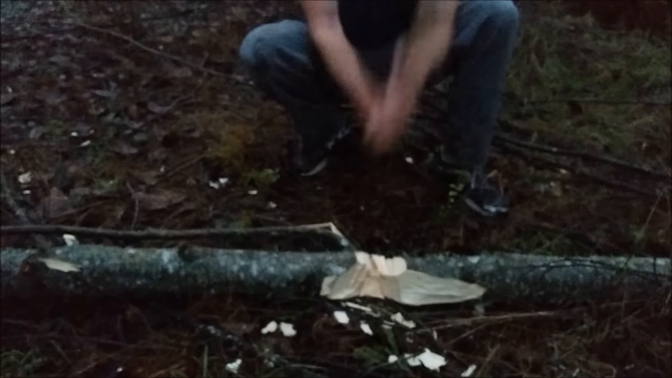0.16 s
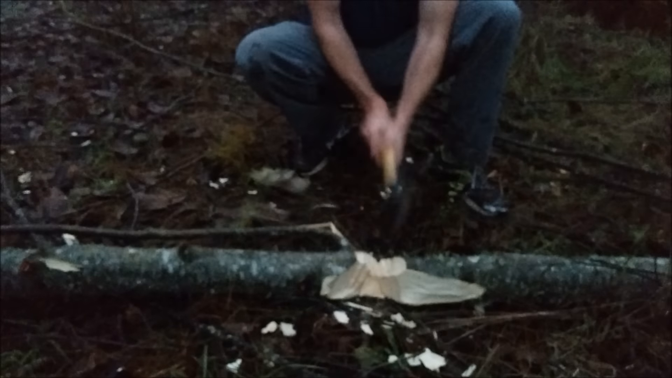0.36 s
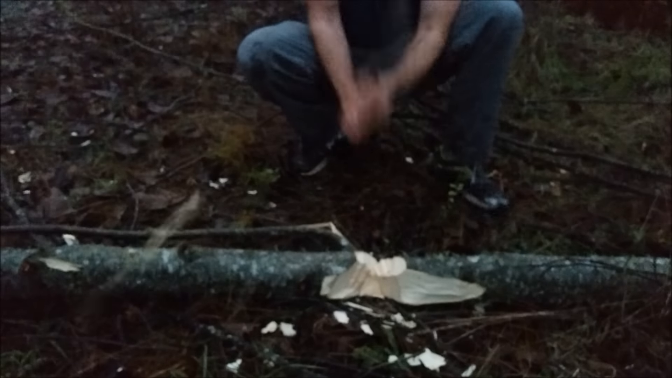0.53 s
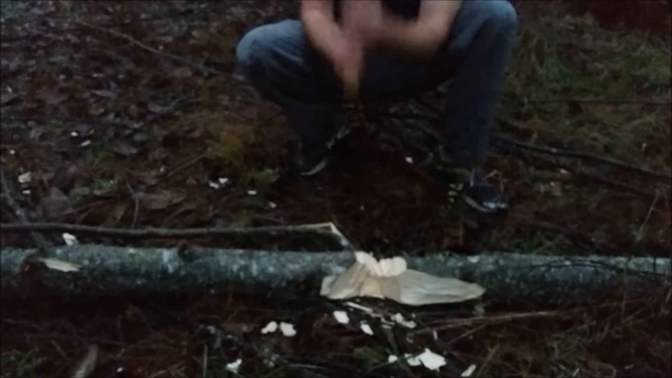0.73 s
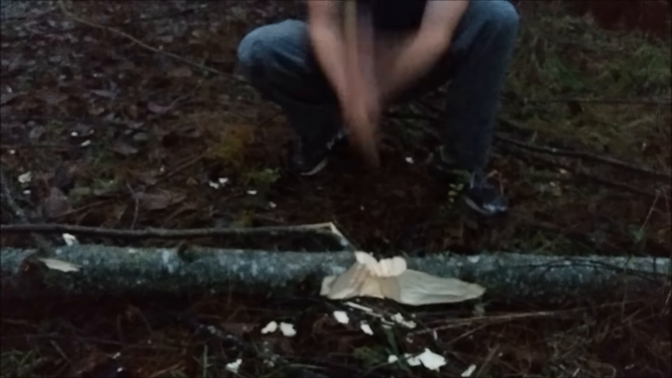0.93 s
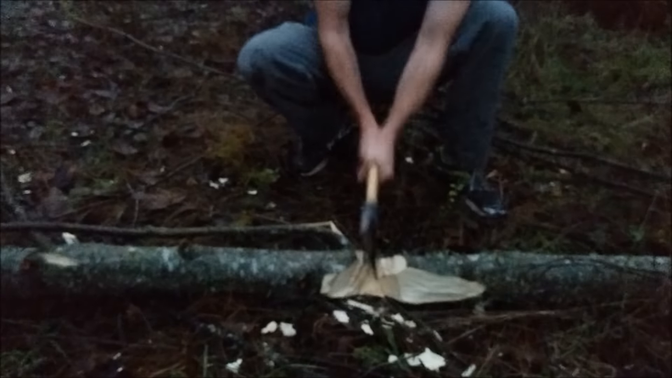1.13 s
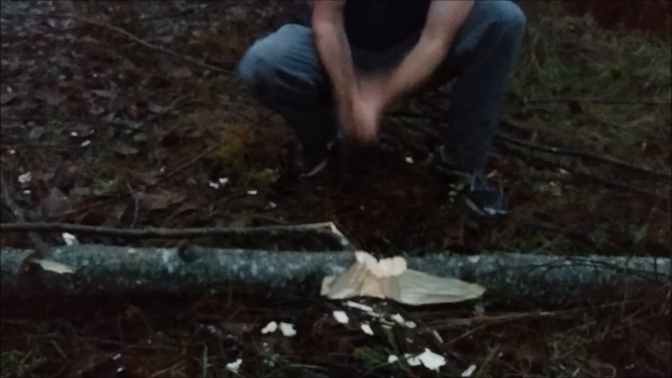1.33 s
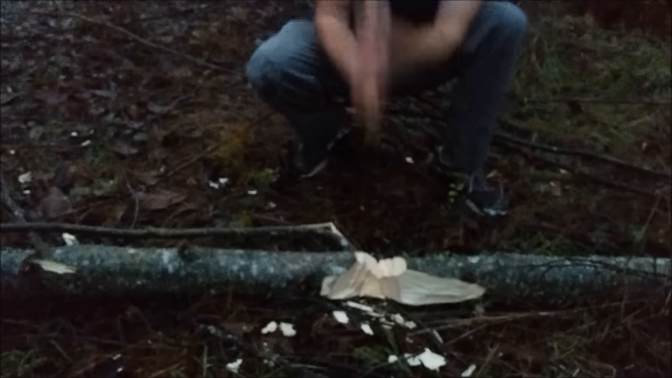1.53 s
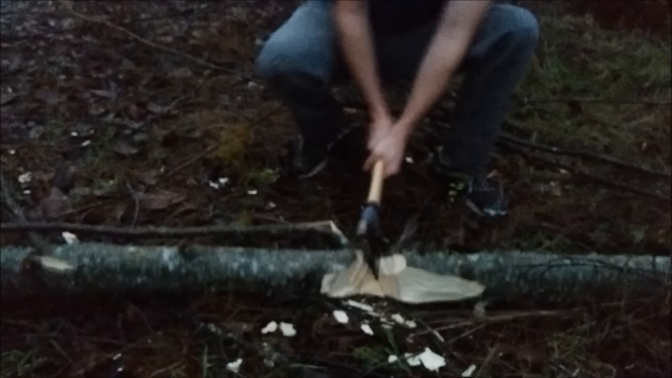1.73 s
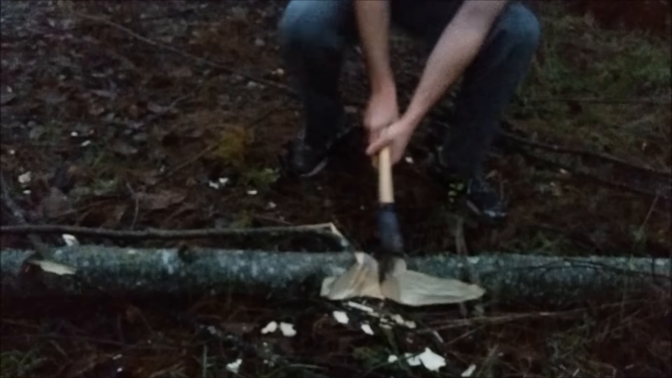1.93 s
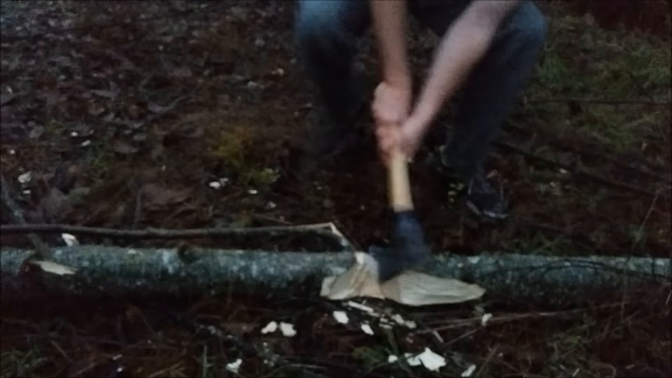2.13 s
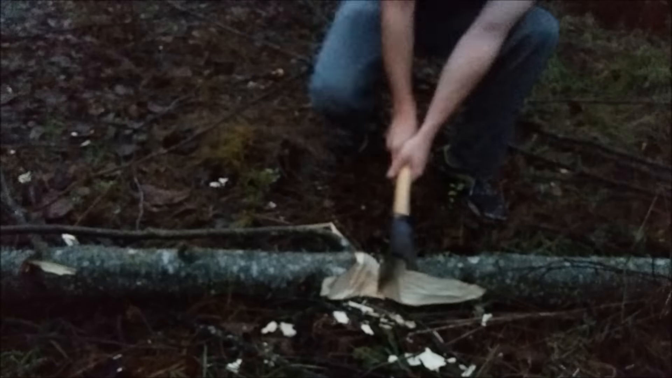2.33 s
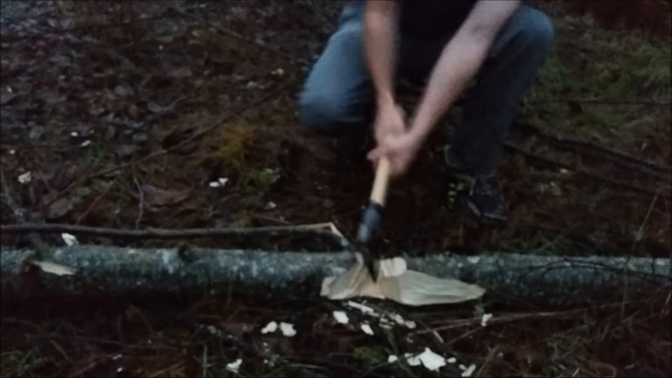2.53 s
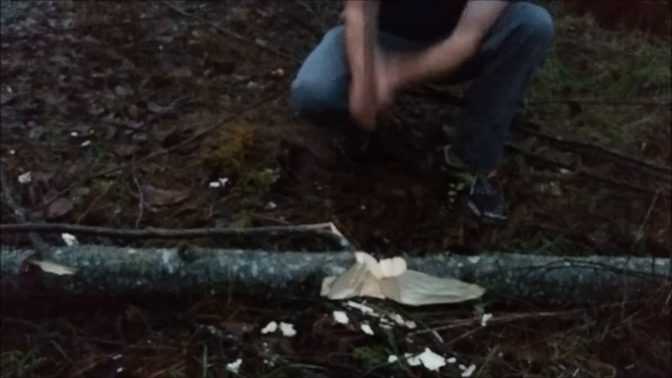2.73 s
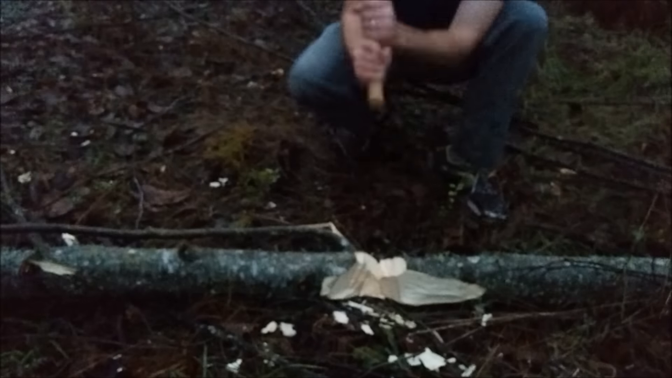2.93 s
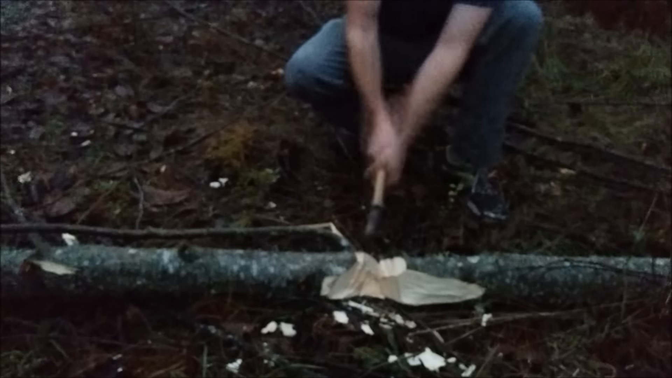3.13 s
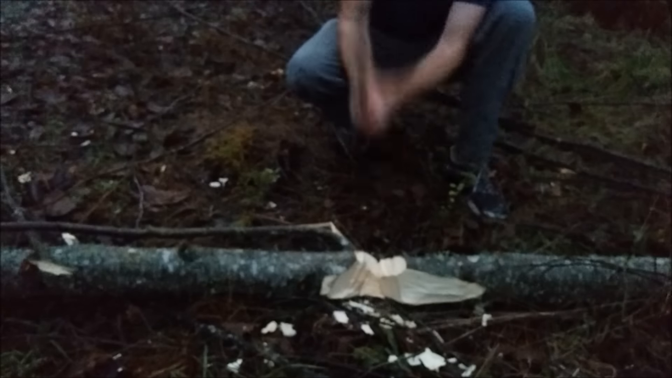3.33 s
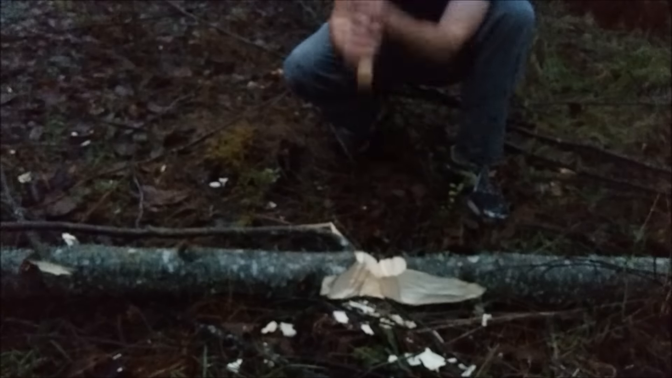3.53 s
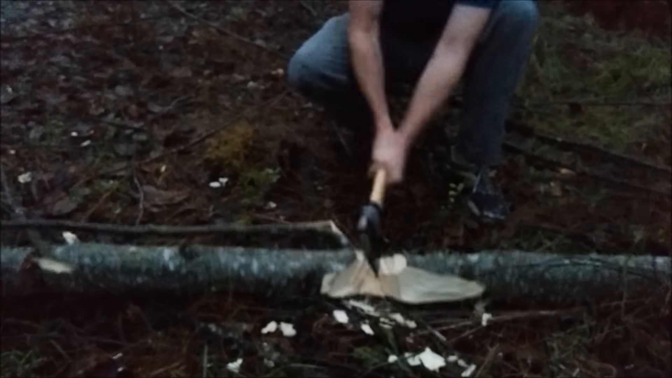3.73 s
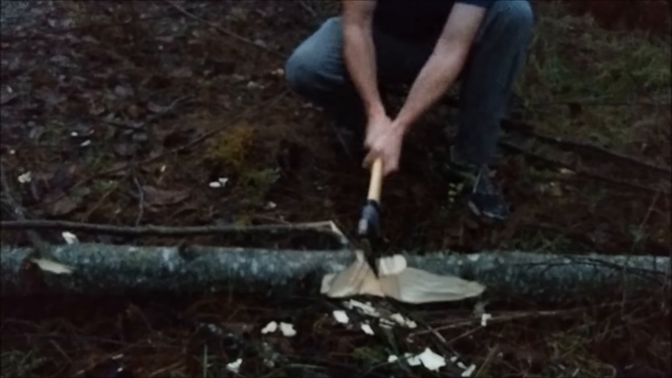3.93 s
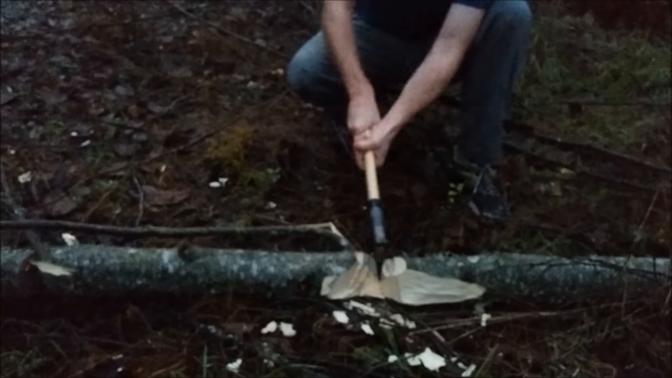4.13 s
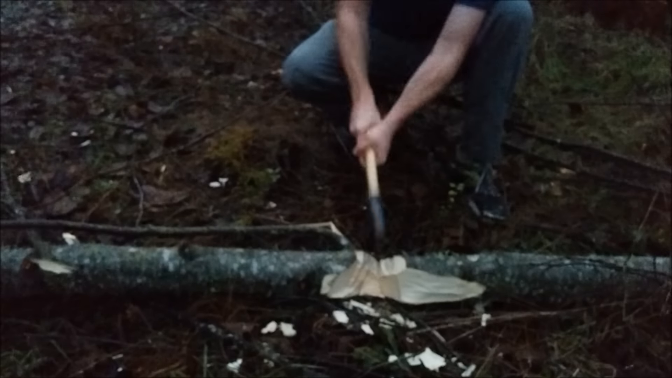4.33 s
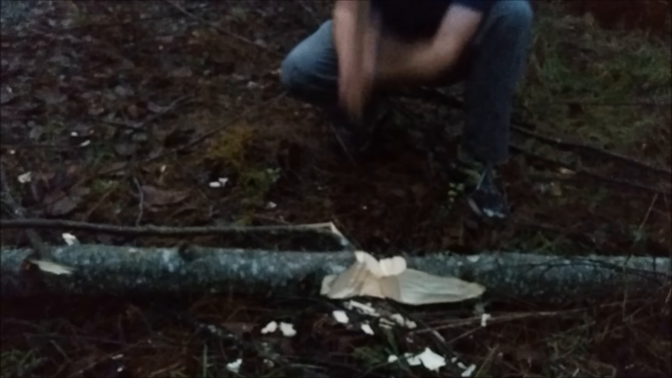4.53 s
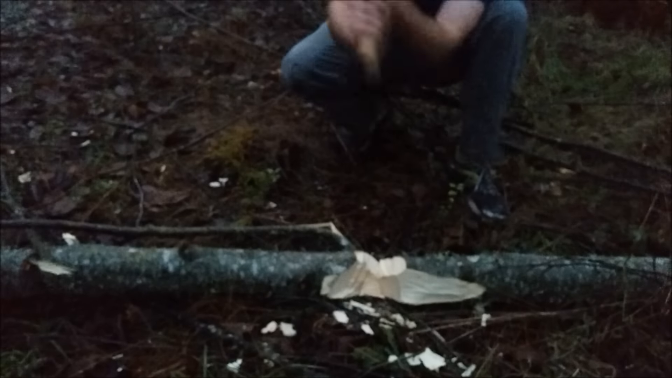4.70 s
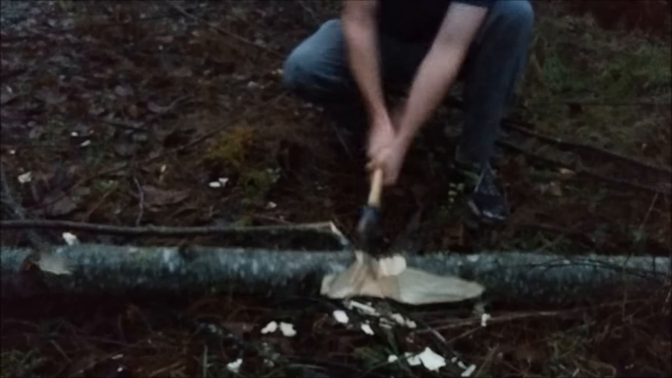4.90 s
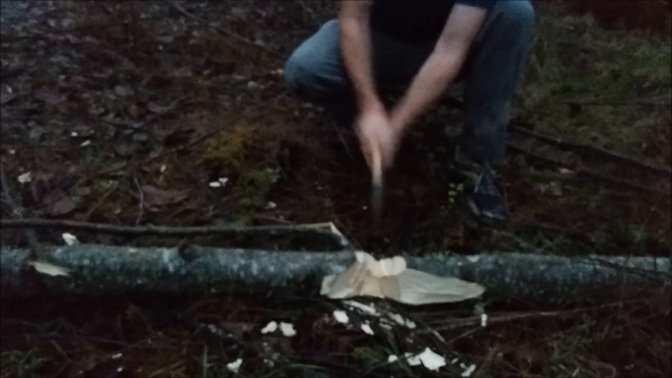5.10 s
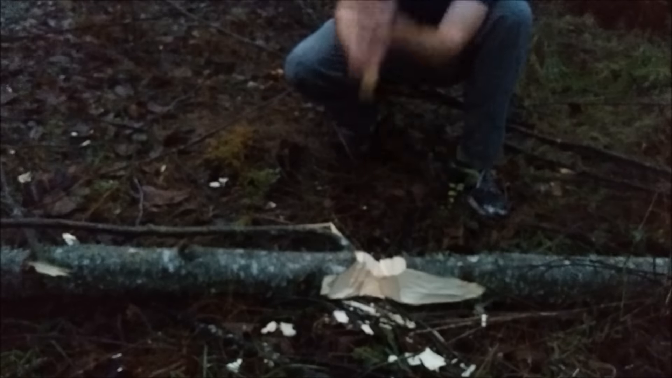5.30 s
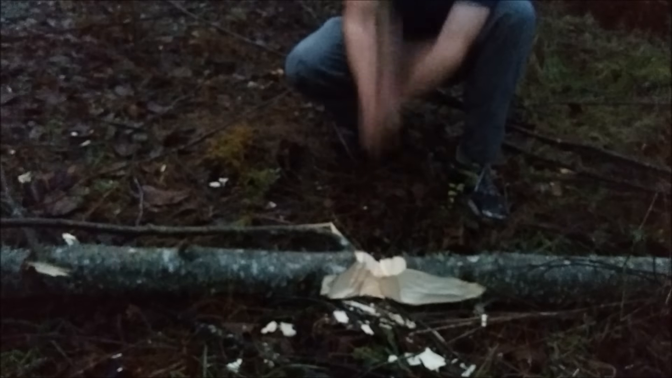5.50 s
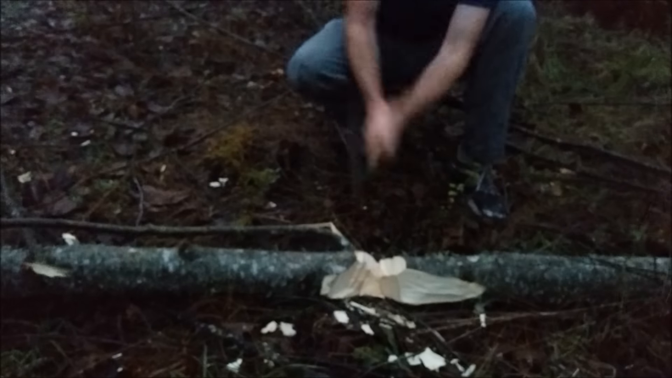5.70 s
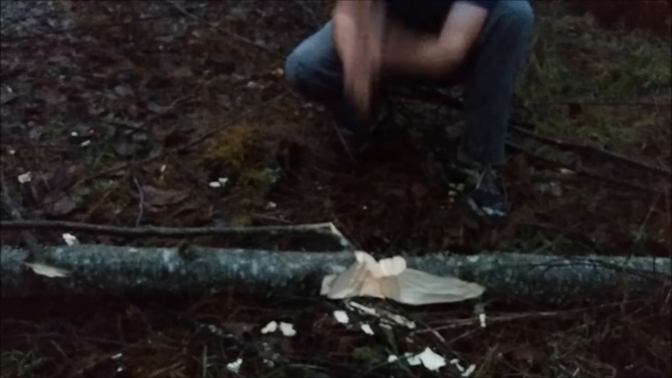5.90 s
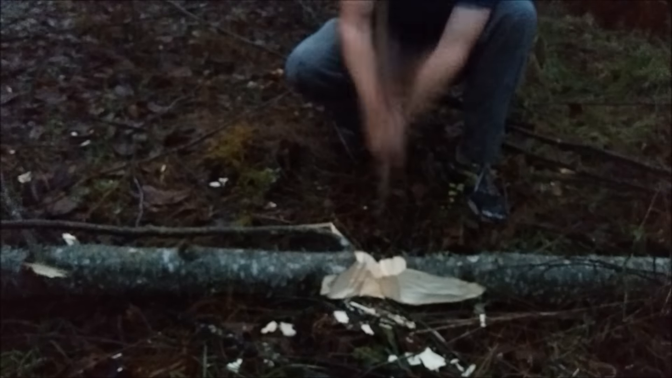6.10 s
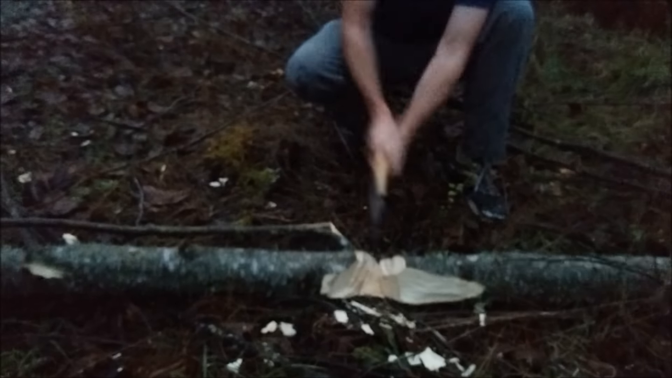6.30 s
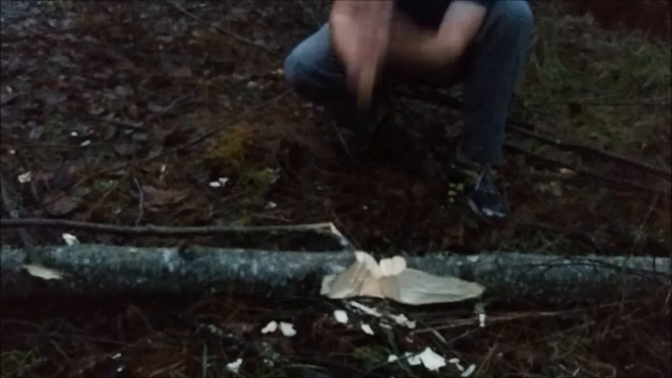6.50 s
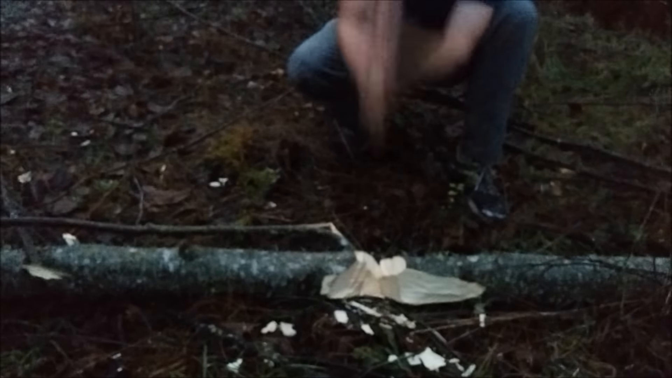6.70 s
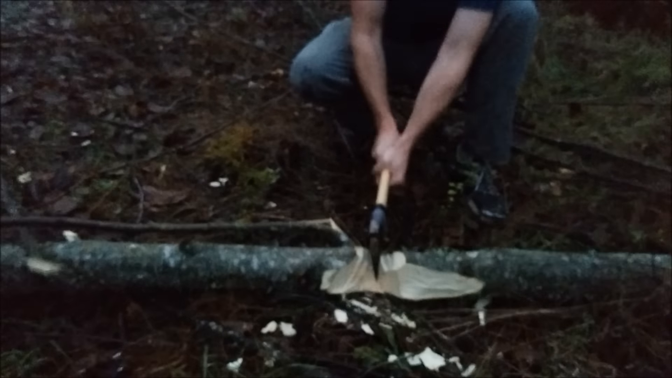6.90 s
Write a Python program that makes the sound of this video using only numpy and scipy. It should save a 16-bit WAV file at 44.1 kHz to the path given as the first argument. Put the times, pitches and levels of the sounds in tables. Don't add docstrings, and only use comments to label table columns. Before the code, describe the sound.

A very quiet forest with faint air and hiss, heard an arm's length from a fallen log. The weak tail of an earlier axe stroke fades among distant trees. At 0.3 s a small axe bites with a bright, splintery crack and short hollow trunk ring; a duller blow follows at 1.15 and a sharp one at 1.75. From 2.1 to 2.35 the edge scrapes the notch, a grainy rasp with a woody hum and low knock at 2.2, then a faint rub until 2.6. Darker chops land at 3.2 and 3.8, then a loud crack at 5.0, a full ring at 5.65, a dark, far-carrying blow at 6.25 and a strongly ringing, softer-cracked one at 6.9. Little chip ticks and splinter snaps fall between. Each blow has a faint bark brush before it, a soft ground thud and brief tree scatter, its tail quickly pushed down.

```python
import sys
import numpy as np
from scipy import signal
from scipy.fft import rfft, irfft
from scipy.io import wavfile
from scipy.ndimage import uniform_filter1d, map_coordinates

SR = 44100
rng = np.random.default_rng(int(sys.argv[2]) if len(sys.argv) > 2 else 0)


def bounce(signal):
    frames = np.transpose(np.atleast_2d(signal))
    limited = np.clip(frames, -1, 1)
    pcm = np.round(limited * 32767).astype(np.int16)
    wavfile.write(sys.argv[1], SR, pcm)


def boost_factor(decibels):
    exponent = np.asarray(decibels, float) / 20
    return 10 ** exponent


N = 306495


def unit(x):
    return x / np.sqrt(np.mean(x ** 2) + 1e-20)


def along(points, hz):
    f, v = np.transpose(points)
    return np.interp(np.log(hz + 1), np.log(f + 1), v)


def noise(n, spectrum):
    hz = np.fft.rfftfreq(n, 1 / SR)
    return unit(irfft(rfft(rng.standard_normal(n)) * boost_factor(along(spectrum, hz)), n))


def patchy_noise(n, spectrum, depth_db):
    z = signal.stft(noise(n, spectrum), nperseg=512)[2]
    field = uniform_filter1d(rng.standard_normal(z.shape), size=4, axis=0)
    field = uniform_filter1d(field, size=5, axis=1)
    return unit(signal.istft(z * boost_factor(depth_db * unit(field)), nperseg=512)[1][:n])


def fade(t, t60, rise):
    return boost_factor(-60 * t / t60) * (1 - np.exp(-t / rise))


def add(track, s, sound):
    part = track[round(s * SR):][:len(sound)]
    part += sound[:len(part)]


def gate(x, closes, depth_db):
    hz, frame, z = signal.stft(x, SR, nperseg=256)
    treble = 1 / (1 + (6000 / (hz[:, None] + 1)) ** 3)
    bass = .4 / (1 + (hz[:, None] / 120) ** 4)
    at = closes[0] + treble * (closes[1] - closes[0])
    shut = 1 / (1 + np.exp(np.clip((at - frame) / .008, -50, 50)))
    gain = boost_factor(depth_db * (1.5 - .1 * treble - bass) * shut)
    return signal.istft(z * gain, SR, nperseg=256)[1][:len(x)]


def air():
    # f/Hz, level/dB
    quiet = [(8, -59.5), (20, -15), (60, -8), (120, -6.5), (300, -9.5), (520, -7), (1000, -11),
             (1300, -15.5), (2000, -14.5), (3000, -18), (6000, -21.5), (12000, -24), (16000, -26)]
    z = signal.stft(noise(N, quiet), nperseg=512)[2]
    field = uniform_filter1d(uniform_filter1d(rng.standard_normal(z.shape), 4, 0), 6, 1)
    patchy = np.linspace(1.3, .3, num=len(z))[:, None]
    hiss = unit(signal.istft(z * boost_factor(0.9 * unit(field) * patchy), nperseg=512)[1][:N])
    return boost_factor(-76) * hiss


def cheek_rub(t):
    start_s, rise_s, hold_s, fall_s = 2.365, 0.036, .11, 0.13
    cheek = [(100, -12), (400, -7.0), (800, -11), (2500, -14), (2900, -4.5), (3250, -13.5), (4100, -9),
             (4600, -19.0), (6000, -15.0), (8000, -29.5), (12000, -60)]
    slide = np.interp(t, start_s + np.cumsum([0, rise_s, hold_s, fall_s]), [0, 1, 1, 0]) ** 2
    catches = boost_factor(3.3 * map_coordinates(rng.standard_normal(N // 200 + 4), [np.arange(N) / 260]))
    return boost_factor(-64.5) * slide * unit(catches) * noise(N, cheek)


def scrape():
    # t/s, level/dB, wood hum against hiss/dB
    pull = [
        (2.11, -83, 4),
        (2.14, -56.5, -7),
        (2.204, -41, -7),
        (2.208, -39, 7.5),
        (2.302, -42.5, -18),
        (2.338, -74.5, 2),
        (2.37, -75.5, 9),
    ]
    # f/Hz, level/dB
    rasp = [(710, -26), (1200, 0.5), (1580, -0.5), (1700, -3), (1850, -2.5), (3050, -5), (5100, -2.5),
            (6590, -12), (7800, -39.5), (10000, -42), (13000, -71), (22000, -120)]
    s, db, body_db = np.transpose(pull)
    t = np.arange(N) / SR
    level, body = np.interp(t, s, db, -130, -130), np.interp(t, s, body_db)
    grains = boost_factor(1.3 * map_coordinates(rng.standard_normal(N // 100 + 4), [np.arange(N) / 110]))
    hum = noise(N, [(150, -40.5), (300, -4), (600, -1), (1200, -6), (1700, -20), (4000, -51), (8000, -90)])
    return cheek_rub(t) + boost_factor(level) * unit(grains) * (noise(N, rasp) + boost_factor(body) * hum)


def snaps():
    # t/s, peak level/dB, centre f/Hz
    splinters = [(0.8121, -43.5, 3540), (1.0493, -55.5, 3630), (1.2294, -39, 9500), (1.2925, -59, 9000),
                 (1.8617, -43.5, 3540), (2.086, -49, 3730), (2.4194, -43.5, 4530), (2.4498, -47, 5350),
                 (2.5438, -48.5, 5500), (2.5794, -64, 4670), (3.268, -29, 3920), (3.4316, -53, 3960),
                 (4.0794, -63, 3850), (4.1244, -63, 3500), (5.7675, -54, 6000), (5.3287, -57, 4020)]
    out, t = np.zeros(N), np.arange(SR // 20) / SR
    for s, db, hz in splinters:
        click = noise(len(t), [(hz * .3, -30), (hz * .75, -9), (hz, 0), (hz * 1.3, -9), (hz * 2, -35)])
        add(out, s, boost_factor(db - 4) * click * fade(t, 0.019, .0005))
    return out


def ticks():
    # t/s, peak level/dB, pitch f/Hz, ring t60/s, treble level/dB
    contacts = [(0.798, -60, 1710, 0.048, -5), (0.8125, -40, 1363, 0.036, -9),
                (0.812, -48.5, 650, 0.037, -30), (2.085, -32.5, 1690, 0.02, -39.5),
                (2.14, -43, 2260, 0.025, -13), (2.16, -43.5, 730, 0.088, -2.5),
                (2.279, -32, 1550, 0.013, -1.5), (2.342, -45, 342, 0.043, -23), (2.39, -56, 250, 0.05, -20),
                (2.599, -56, 385, 0.025, -20), (3.336, -24.5, 1260, 0.03, -23),
                (3.932, -29, 1440, 0.037, -32), (4.364, -46, 585, 0.064, -28.5),
                (4.489, -62, 1460, 0.038, -19.5), (5.112, -34, 1226, 0.085, -34.5),
                (6.399, -31, 497, 0.022, -15.5), (6.507, -50, 1497, 0.025, -25),
                (6.609, -53, 778, 0.017, -32)]
    out, t = np.zeros(N), np.arange(SR // 5) / SR
    click_colour = [(300, -35), (1500, 2), (3700, 9), (4800, -17), (6000, -3), (8000, -20), (10000, -30),
                    (16000, -60)]
    for s, db, hz, t60, treble_db in contacts:
        woody = [(hz * .1, -70), (hz * .4, -22), (hz * .75, -5), (hz, 0), (hz * 1.4, -7), (hz * 2.2, -30),
                 (16000, -80)]
        note = .6 * np.sin(2 * np.pi * hz * t) + .55 * noise(len(t), woody)
        note = note * fade(t, t60, 0.00035 * 1000 / hz + 0.00036)
        click = noise(len(t), click_colour) * fade(t, 1.3 * t60, .0004)
        add(out, s, boost_factor(db) * (note + boost_factor(treble_db) * click))
    return out


def knock():
    # t/s, peak level/dB, f/Hz, t60/s
    knocks = [
        (2.21, -11.5, 291, 0.091),
    ]
    out, t = np.zeros(N), np.arange(SR // 5) / SR
    for s, db, hz, t60 in knocks:
        for ratio, gain, share in [(1, 0.35, 0.69), (2.1, 0.55, 0.28), (4.3, 0.71, 0.24)]:
            partial = gain * np.sin(2 * np.pi * hz * ratio * t) * fade(t, t60 * share, 0.0049)
            add(out, s, boost_factor(db) * partial)
    return out


def trees(t, treble_db, top_db):
    # f/Hz, level/dB
    answer = [(60, -23.5), (180, -15), (330, -8), (600, -15.5), (1000, -16), (1500, -22), (2400, -29),
              (3000, -34.5), (5000, -30.5), (7000, -33.5), (9500, -31), (13000, -35.5), (15600, -38),
              (15900, -75)]
    # f/Hz, t60/s
    answer_t60 = [(60, 0.24), (300, 0.32), (1000, .36), (4000, .36), (10000, 0.33)]
    hz, frame, z = signal.stft(noise(len(t), answer), SR, nperseg=256)
    treble = treble_db / (1 + (3500 / (hz + 1)) ** 4)
    top = top_db / (1 + (8000 / (hz + 1)) ** 4)
    echoes = unit(uniform_filter1d(rng.standard_normal(z.shape), size=20, axis=0))
    decay = boost_factor(2 * echoes - 60 * frame / along(answer_t60, hz)[:, None])
    tail = signal.istft(z * boost_factor(treble + top)[:, None] * decay, SR, nperseg=256)[1]
    return tail[:len(t)] * (1 - np.exp(-t / 0.0016))


def steel(t):
    # f/Hz, width/Hz, level/dB
    head = [(3880, 360, 1.5), (5650, 480, -3.5), (2370, 67, -5.5)]
    hz = np.fft.rfftfreq(len(t), 1 / SR)
    bands = sum(boost_factor(db) / (1 + (2 * (hz - c) / w) ** 2) for c, w, db in head)
    return unit(irfft(rfft(rng.standard_normal(len(t))) * bands, len(t))) * fade(t, 0.31, 0.0036)


def faint_swell():
    rise = np.linspace(0, 1, 500)
    swell_colour = [(150, -18.5), (550, 0.5), (1200, -7), (2500, -12.5), (6000, -19), (16000, -45)]
    return boost_factor(-47) * noise(len(rise), swell_colour) * np.sqrt(rise)


def ground_thud(t):
    # f/Hz, level/dB
    ground = [(8, -50), (20, -19), (40, -12.5), (70, -3), (110, 1), (150, -6.5), (220, -29.5), (500, -69.5)]
    return noise(SR, ground) * fade(t, 0.19, .015)


def fibre_crack(t, split_ms):
    # f/Hz, level/dB
    fibres = [(410, -27), (700, 2.5), (2370, -9), (3070, -18.5), (4150, -15), (4670, -13.5), (5840, -9.5),
              (7110, -16), (9600, -9.5), (10500, -16), (13000, -17), (16000, -23.5)]
    grains = boost_factor(3.2 * rng.standard_normal(SR // 24 + 1)).repeat(24)[:SR]
    splitting = .12 + 1 / (1 + (1000 * t / split_ms) ** 4)
    return noise(SR, fibres) * grains * fade(t, 0.039, 0.00015) * splitting


def bite_force(t):
    bite_s = .009
    push = t[:round(1.5 * bite_s * SR)]
    uneven = unit(noise(len(push), [(100, -7.5), (2000, 3.5), (5000, -19)])) / np.sqrt(len(push) * 12)
    stop = np.exp(-((push - bite_s) / 0.00013) ** 2) / 15
    contact = 0.2 * np.exp(-((push - .0006) / 0.00004) ** 2) / 9
    return 0.36 * uneven + stop - contact


def trunk_ring(t, ring_db, crack_db):
    # f/Hz, level/dB, t60/s
    trunk = [(138.6, -15.5, 0.22), (176, -9.5, 0.34), (209.26, -25.5, .14), (272, -8, 0.3),
             (317.5, 2, 0.26), (378.4, -6, 0.32), (427.5, 3.5, 0.13), (472.7, 0.5, 0.096), (526.5, 2, 0.16),
             (589.4, -1, .11), (627.6, 3, 0.085), (725.5, -9, .14), (812, -5.5, 0.32), (924, -16.5, .18),
             (1061, -14, .15), (1196, -9, 0.12), (1290, -18, 0.084), (1388, -16, 0.26), (1453, -17.5, .11),
             (1820, -22, 0.073), (1910, -20, 0.2), (2300, -24, .08), (341.3, -3.5, .17), (666, -4.5, .1),
             (829, -10.5, .12), (989, -11.5, .12)]
    # f/Hz, level/dB, more level for each dB of crack/dB
    notch = [(200.1, -1.64, -0.1), (317, -3, 0.12), (430, 0.04, 0.03), (650, -1, .5), (800, 1, 0.37),
             (1200, 0.37, 0.26)]
    hz, level, t60 = np.transpose(trunk)[:, :, None]
    short = t[:SR // 2]
    place = [(at, db + more * crack_db) for at, db, more in notch]
    strength = boost_factor(level + ring_db + along(place, hz) + rng.normal(0, 2.2, hz.shape))
    drift = np.cumsum(rng.standard_normal((len(hz), 441)), axis=1).repeat(50, axis=1)
    phase = 2 * np.pi * hz * short + .00008 * hz * drift
    damping = np.minimum(t60, 60 / hz + .03)
    modes = strength * boost_factor(-60 * short / damping) * np.sin(phase)
    return np.pad(signal.fftconvolve(modes.sum(0), bite_force(t)), (0, SR))[:SR]


def chops():
    # t/s, trunk ring level/dB, crack level/dB, splinter brightness/dB, carry into the trees/dB
    strokes = [
        (0.3104, -9.5, -0.5, 7.5, 0),
        (1.1531, -12, 0.5, -8, 0.1),
        (1.7466, -8, 1.5, 1.5, -4.5),
        (3.2032, -9, -3, -11, 0.4),
        (3.8035, -8, -2.5, -11, 2.5),
        (4.9857, -7, 2, -6.5, 2),
        (5.6404, -6.5, -2.5, -5.5, -1.5),
        (6.2704, -9, 0, -14, 3),
        (6.8936, -6, -5.5, -9, 0.2),
    ]
    # f/Hz, level/dB
    far_trees = [(40, -72), (100, -26.5), (300, -11.5), (550, -7), (780, 0.5), (900, -6), (1050, 1.5),
                 (1250, -6), (1480, 0.5), (1750, -9), (2000, -6), (3000, -16), (4000, -22), (9000, -38)]
    out, t = np.zeros(N), np.arange(SR) / SR
    small = signal.butter(3, 190, "highpass", fs=SR, output="sos")
    add(out, 0, boost_factor(-67.5) * noise(SR, far_trees) * fade(t, 0.4, 0.0012))
    for s, ring_db, crack_db, bright_db, carry_db in strokes:
        scatter_db, steel_db, far_db = -19 + carry_db, -37.5 + .7 * carry_db, -49 + 1.3 * carry_db
        treble_db = -0.5 + .6 * bright_db
        top_db = bright_db - treble_db
        split_ms = 2.6 + .3 * bright_db - 0.64 * ring_db
        gate_s = .155 + 0.01 * carry_db
        top_gate_s = .096 + .002 * (bright_db + 2 * carry_db)
        closes = gate_s, top_gate_s

        crack = boost_factor(crack_db - 3.5) * fibre_crack(t, split_ms)
        ring = boost_factor(-0.5) * trunk_ring(t, ring_db, crack_db)
        blow = signal.sosfilt(small, crack + ring)
        thud = boost_factor(ring_db - 32.5) * ground_thud(t)
        near = blow + thud + boost_factor(scatter_db) * trees(t, treble_db, top_db)
        add(out, s, gate(near, closes, depth_db=-13))
        add(out, s, boost_factor(far_db) * patchy_noise(SR, far_trees, depth_db=3.7) * fade(t, .9, .03))
        add(out, s, boost_factor(steel_db) * gate(steel(t), np.add(closes, .04), depth_db=-17))
        swell = faint_swell()
        add(out, s - len(swell) / SR, swell)
    return out


def scene():
    return (air() + scrape() + snaps() + ticks() + knock() + chops())[None]


def band_limit(x):
    return signal.sosfilt(signal.butter(12, 17100, fs=SR, output="sos"), x)


def record(dry):
    limited = dry / (1 + np.abs(dry / .84) ** 6) ** (1 / 6)
    offset = -.0004
    hz = np.fft.rfftfreq(N, 1 / SR)
    mix = irfft(rfft(limited + offset) / (1 + (hz / 16050) ** 80), N)
    return band_limit(mix)


dry = scene()
out = record(dry)
bounce(out)
```